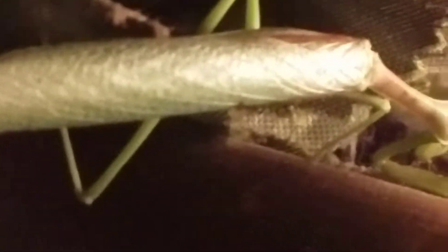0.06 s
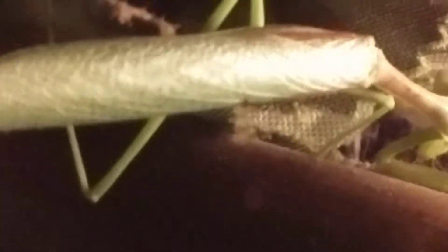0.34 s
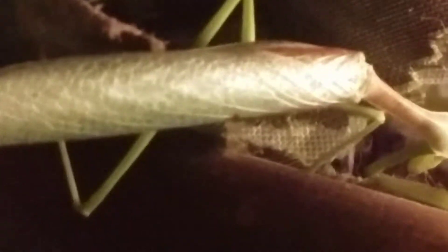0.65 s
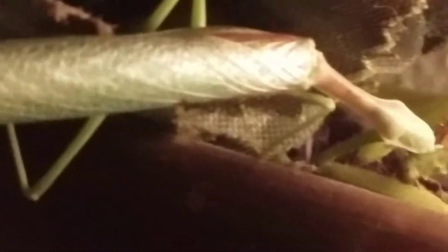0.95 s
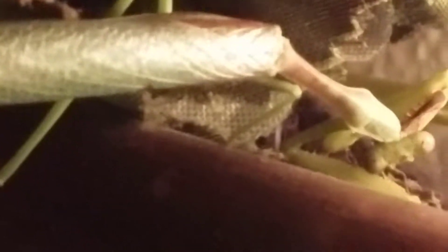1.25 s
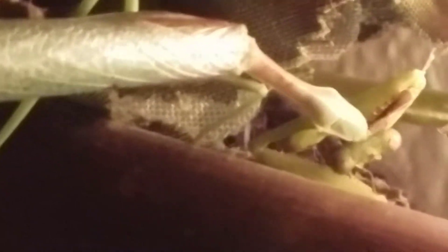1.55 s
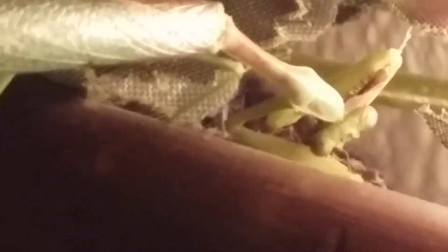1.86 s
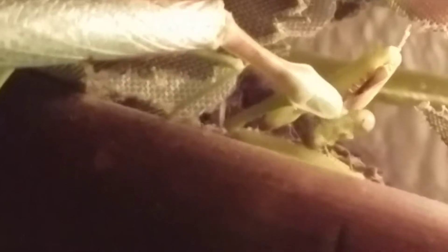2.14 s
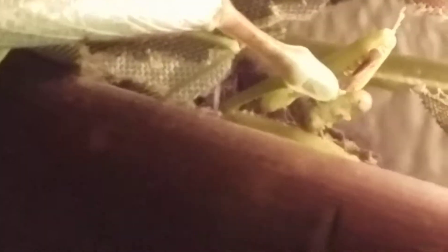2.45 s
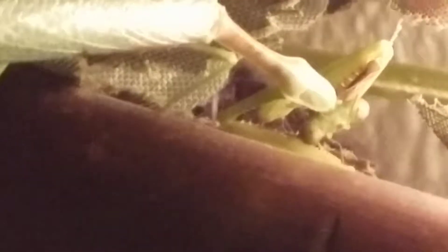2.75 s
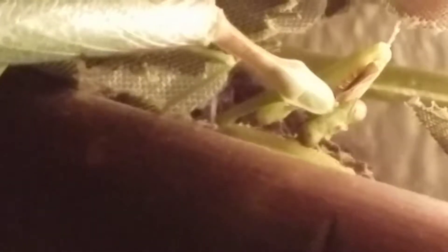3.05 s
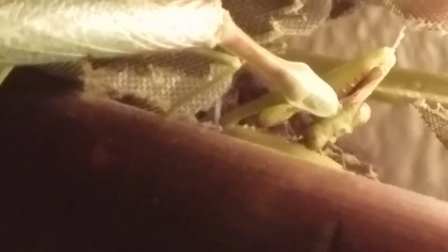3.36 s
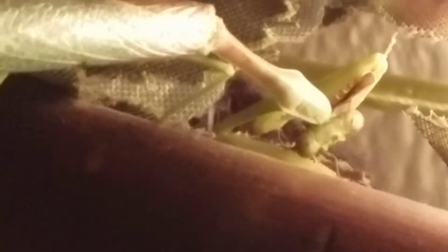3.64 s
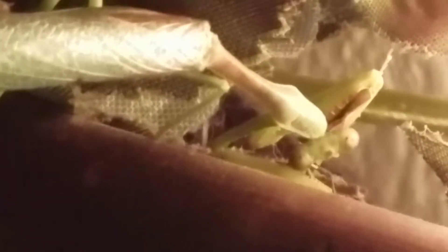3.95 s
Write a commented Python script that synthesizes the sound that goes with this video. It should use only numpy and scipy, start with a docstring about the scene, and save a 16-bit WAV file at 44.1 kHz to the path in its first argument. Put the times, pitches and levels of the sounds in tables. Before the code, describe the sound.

Low motor hum with faint hiss, growing louder and deeper after about two seconds.

```python
"""A quiet room with an appliance motor humming, heard through a close, hand-held microphone.
From the start, fan and mains tones, moving air, hiss and a thin electronic whine lie under the hum.
A faint squeak and three tiny handling ticks come in the first moments, a brief low ring at 1.2 s.
Towards two seconds the hum swells, and a deep drone and the rumble come up with it.
One more tick touches the microphone at 2.5 s, and the hum stays up to the end."""
import sys
import numpy as np
from scipy import signal
from scipy.io import wavfile

SR = 44100
rng = np.random.default_rng(int(sys.argv[2]) if len(sys.argv) > 2 else 0)


def store_pcm(level_fs):
    """Save levels as 16-bit WAV."""
    pcm = np.round(np.clip(level_fs, -1, 1) * 32767).astype(np.int16)
    wavfile.write(sys.argv[1], SR, np.atleast_2d(pcm).T)


N = 176400
TIME = np.arange(N) / SR

# the hum's swell, read against FULL_HUM_DB: (time [s], level [dB])
HUM_LEVEL = [(0.05, -63), (0.18, -61.5), (0.38, -68.5), (0.61, -58.5), (1.31, -57.5), (1.42, -60),
             (1.6, -60), (1.96, -48), (2.05, -46.5), (2.53, -44), (2.6, -45.5), (2.84, -44), (3.9, -44)]
FULL_HUM_DB = -43.7
# shaft speed: (time [s], speed [turns/s])
SHAFT_SPEED = [(0, 58.7), (.4, 58.8), (.6, 59.15), (1.1, 59.05), (1.5, 58.65), (2.3, 58.75), (3.2, 58.55),
               (4, 58.55)]
# motor partials: (multiple of shaft speed, level at full hum [dB], share of the swell)
MOTOR_PARTIALS = [(1, -60.5, 0.98), (2, -43.2, 1.06), (4, -68, 0.74), (5, -76, .3), (6, -69, .9),
                  (7, -79, .3), (8, -76.5, .4), (26, -92.5, .1), (27, -92.5, 0.12), (28, -88.5, .1),
                  (29, -88, 0.12)]
# the third partial, which fades and swells on its own: (time [s], level [dB])
THIRD_PARTIAL = [(0, -87), (.3, -81), (.6, -73), (1.3, -70), (1.6, -77.5), (1.9, -64.5), (2.3, -54),
                 (2.55, -58), (3, -58), (3.65, -67.5), (3.85, -58), (4, -68)]
# where the partials sit at the microphone: (frequency [Hz], left over right [dB])
MOTOR_PAN = [(60, -1), (118, -.2), (235, -6), (295, -9), (352, -5), (470, -7), (1520, 4), (1580, 12),
             (1640, 2), (1700, -10)]
# fan and mains: (frequency [Hz], level at full hum [dB], share of the swell, left over right [dB])
FAN_MAINS_TONES = [(100.9, -69, .9, -3.5), (119.5, -65, .8, 4.5), (202, -70, 0.74, 0), (239.8, -74, 0.9, 3),
                   (298, -75, 0.71, 1.5), (306.5, -79, -0.23, 0), (324, -77.5, .3, -1),
                   (359.8, -67, 0.26, 0), (404, -77, 0.34, 1.5), (507, -82.5, .3, -5.5),
                   (908, -91.5, 0.26, 1)]
# four noise spectra of the room: (frequency [Hz], relative density [dB])
RUMBLE = [(20, -16), (45, -13.5), (65, -9.5), (82, -2.5), (105, -1), (160, -3), (220, -13), (330, -14.5),
          (500, -24.5), (800, -33)]
AIR = [(20, -8), (45, -11.5), (90, -2), (200, -6), (270, -1.5), (330, -4), (450, -0.5), (540, -6),
       (750, -11), (1200, -16), (3000, -37)]
HISS = [(500, -7.5), (1000, -2.5), (1650, 0), (2500, -3.5), (4000, -9), (6000, -13.5), (9000, -16.5),
        (11000, -17), (16000, -9.5)]
TOP_HISS = [(8000, -45), (10500, -28), (12500, -3.5), (14000, 2), (16000, -2)]
# their mix: (spectrum, level at full hum [dB], share of the swell)
NOISE_LAYERS = [(RUMBLE, -54.5, 1), (AIR, -66.5, 0.05), (HISS, -68.5, 0.099), (TOP_HISS, -77, 0.15)]
# how alike the noise is on both sides of the microphone: (frequency [Hz], correlation)
NOISE_LIKENESS = [(40, -0.4), (150, -0.3), (300, 0.9), (450, 0.6), (700, 0), (1500, -0.08), (9000, -0.02),
                  (14000, -0.06)]
# which way the noise leans: (frequency [Hz], left over right [dB])
NOISE_PAN = [(60, -2), (250, 3.5), (450, -6.5), (600, -5.5), (1400, -1), (3000, -3.5), (6000, -1),
             (9500, -0.2), (15000, 0.5)]
# resonances in moving air: (frequency [Hz], width [Hz], level at full hum [dB], share of the swell)
AIR_RESONANCES = [(82.3, 11, -66, 0.89), (135, 25, -70, 0.9), (413, 20, -71.5, .15), (470.5, 16, -73, 0.2)]
# the growing electronic whine: (time [s], level [dB])
WHINE_LEVEL = [(0, -91), (.7, -88), (1.1, -84), (2, -82.5), (3.3, -79.5), (4, -78)]
# the squeak, then the low ring: (centre time [s], half length [s], frequency [Hz], level [dB])
SQUEAK_AND_RING = [(.05, .035, 1510, -75.5), (1.2, .06, 358, -65)]
# handling ticks on the microphone: (time [s], level [dB])
HANDLING_TICKS = [(.077, -78.5), (.125, -73.5), (.253, -72.5), (2.511, -76.5)]


def from_db(db):
    """Decibels to gain."""
    return 10 ** (np.asarray(db) / 20)


def unit_power(x):
    """Scale to an rms of 1."""
    return x / np.sqrt(np.mean(x ** 2) + 1e-20)


def in_time(rows):
    """Read a (time [s], value) table at every sample."""
    return np.interp(TIME, *np.transpose(rows))


def at_hz(rows, hz):
    """Read a table on a log-frequency axis."""
    freqs, values = np.transpose(rows)
    return np.interp(np.log(hz), np.log(freqs), values)


def pan(db):
    """Left and right gains for a level difference."""
    return from_db(np.array([[db], [-db]]) / 2)


def drift(rate_hz):
    """Slow random wander of spread 1."""
    step, run_in = 100, 2000
    pole = np.exp(-2 * np.pi * rate_hz * step / SR)
    white = rng.standard_normal(N // step + run_in + 2)
    slow = signal.lfilter([1], [1, -2 * pole, pole * pole], white)[run_in:]
    return np.interp(np.arange(N) / step, np.arange(len(slow)), (slow - slow.mean()) / slow.std())


def tone(cycles, db, pan_db):
    """A sine of the given rms level, placed between left and right."""
    return np.sqrt(2) * from_db(db) * np.sin(2 * np.pi * (cycles + rng.random())) * pan(pan_db)


def bandpass(pair, low_hz, high_hz, order=2):
    """One band of a pair of signals, keeping the last N samples."""
    band = signal.butter(order, [low_hz, high_hz], "band", fs=SR, output="sos")
    return signal.sosfilt(band, pair)[:, -N:]


def motor_hum(swell_db):
    """The motor, close by: partials locked to the shaft, those above the third wavering in level."""
    speed = in_time(SHAFT_SPEED)
    turns = np.cumsum(speed) / SR
    out = tone(3 * turns, in_time(THIRD_PARTIAL), pan_db=-2)
    for multiple, db, share in MOTOR_PARTIALS:
        waver_db = (multiple > 3) * 1.4 * drift(rate_hz=2.2)
        pan_db = at_hz(MOTOR_PAN, multiple * speed.mean())
        out += tone(multiple * turns, db + share * swell_db + waver_db, pan_db)
    return out


def fan_and_mains(swell_db, waver_db=0.5):
    """A fan and the mains hold steady pitches that waver a little in level."""
    return sum(tone(hz * TIME, db + share * swell_db - waver_db * drift(rate_hz=2.2), pan_db)
               for hz, db, share, pan_db in FAN_MAINS_TONES)


def electronic_whine(hz=15056):
    """A thin tone at the edge of hearing, left of the microphone."""
    return tone(hz * TIME, in_time(WHINE_LEVEL), pan_db=4.5)


def room_noise(swell_db):
    """Room tone: rumble, air and hiss in third-octave bands, each rising by its share of the swell."""
    edges = np.geomspace(18, 17500, 31)  # Hz
    centres, widths = np.sqrt(edges[1:] * edges[:-1]), np.diff(edges)
    layers = []
    for spectrum, db, share in NOISE_LAYERS:
        in_range = centres < 2 * spectrum[-1][0]  # up to an octave past the last row
        band_power = from_db(at_hz(spectrum, centres)) ** 2 * widths * in_range
        layers.append((band_power / band_power.sum(), from_db(db + share * swell_db) ** 2))
    out, white = 0, rng.standard_normal((2, 2, N + SR // 2))
    for k, hz in enumerate(centres):
        mid, side = unit_power(bandpass(white[k % 2], edges[k], edges[k + 1]))
        alike = at_hz(NOISE_LIKENESS, hz)
        stereo = np.sqrt(1 + alike) * mid + np.sqrt(1 - alike) * side * [[1], [-1]]
        gain = np.sqrt(sum(fraction[k] * power for fraction, power in layers) / 2)
        out += gain * pan(at_hz(NOISE_PAN, hz)) * stereo
    return out


def air_resonances(swell_db, side_gain=0.65):
    """Turbulence rings a few broad resonances, which waver at random, a little to the right."""
    out = 0
    for hz, width, db, share in AIR_RESONANCES:
        turbulence = rng.standard_normal((2, N + SR // 2))
        mid, side = bandpass(turbulence, hz - width / 2, hz + width / 2)
        out += from_db(db + share * swell_db) * unit_power(mid + side_gain * side * [[1], [-1]])
    return out * pan(db=-1.5)


def squeak_and_ring(pitch_jitter=0.025):
    """Two faint, unsteady tones, dead centre; each swells and fades in a bell shape."""
    out = 0
    for centre_s, half_s, hz, db in SQUEAK_AND_RING:
        bell = np.exp(-((TIME - centre_s) / half_s) ** 2)
        cycles = hz * np.cumsum(1 + pitch_jitter * drift(rate_hz=30)) / SR
        out += bell * tone(cycles, db, pan_db=0)
    return out


def handling_ticks(decay_s=0.006):
    """Tiny bright scuffs of the hand on the microphone, dying within milliseconds."""
    envelope = sum(from_db(db) * (TIME >= start) * np.exp(-np.abs(TIME - start) / decay_s)
                   for start, db in HANDLING_TICKS)
    scuff = bandpass(rng.standard_normal((2, N)), low_hz=6350, high_hz=7650, order=1)
    return envelope * unit_power(scuff)


def deep_drone(hz=74.7, start_s=1.67, rise_s=0.37, sag_db_per_s=1.6, waver_db=1.65):
    """A deep tone fades into the room, beats against the hum and eases off slowly."""
    age = TIME - start_s
    fade_in = np.clip(age / rise_s, 0, 1)
    level_db = -54 - sag_db_per_s * age + waver_db * drift(rate_hz=4)
    return fade_in * tone(hz * TIME, level_db, pan_db=-2.5)


def scene():
    """The room at the microphone: the hum and all that swells with it, then the small sounds."""
    swell_db = in_time(HUM_LEVEL) - FULL_HUM_DB
    background_db = np.maximum(swell_db, -16)  # the background holds steady when the hum is weakest
    machines = motor_hum(swell_db) + fan_and_mains(background_db) + deep_drone() + electronic_whine()
    room = room_noise(background_db) + air_resonances(background_db)
    return machines + room + handling_ticks() + squeak_and_ring()


def record(dry, cutoff_hz=15750):
    """The microphone's signal, with the top cut steeply."""
    return signal.sosfilt(signal.ellip(12, .1, 80, cutoff_hz, fs=SR, output="sos"), dry)


dry = scene()
out = record(dry)
store_pcm(out)
```